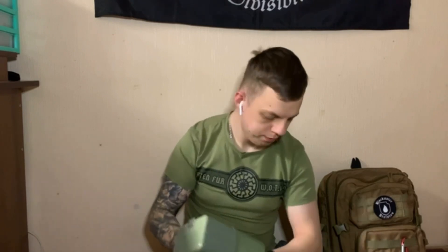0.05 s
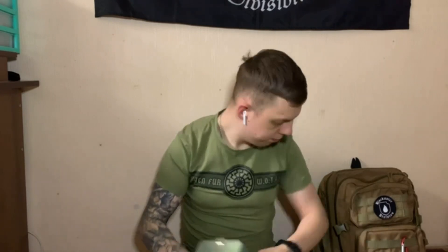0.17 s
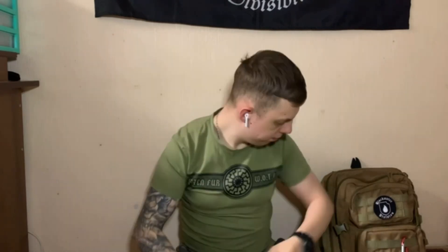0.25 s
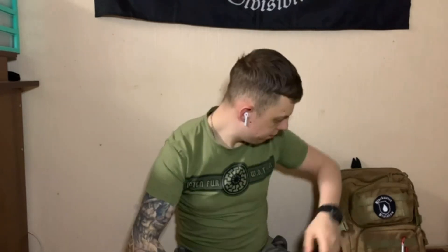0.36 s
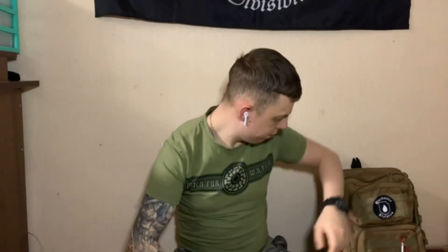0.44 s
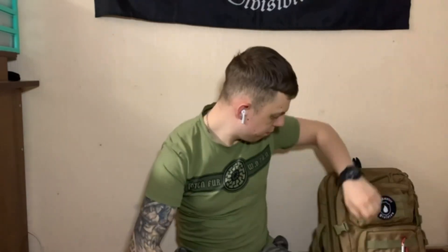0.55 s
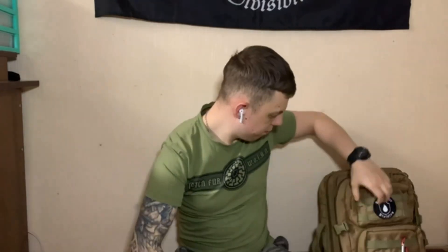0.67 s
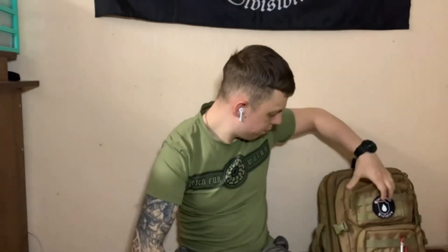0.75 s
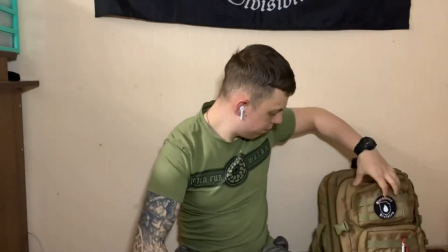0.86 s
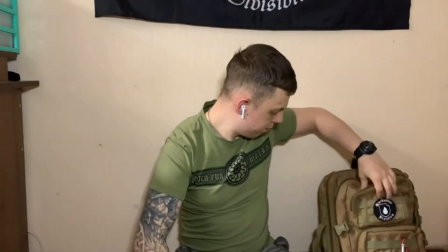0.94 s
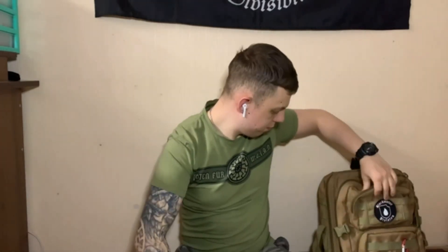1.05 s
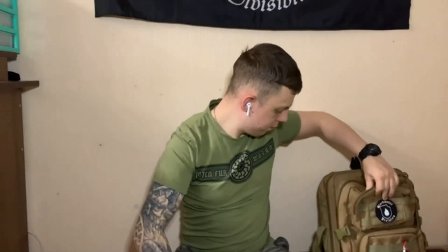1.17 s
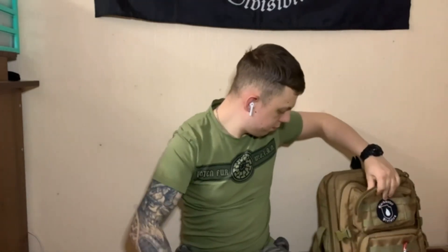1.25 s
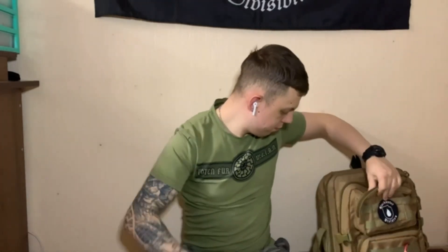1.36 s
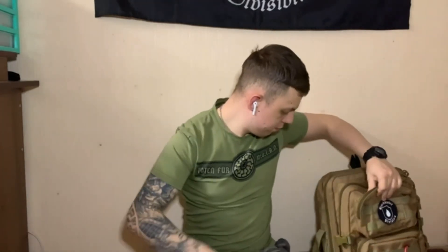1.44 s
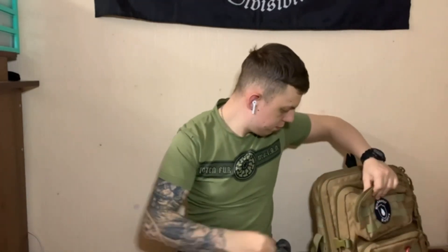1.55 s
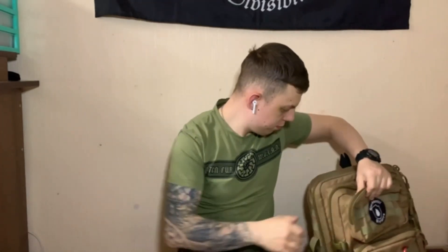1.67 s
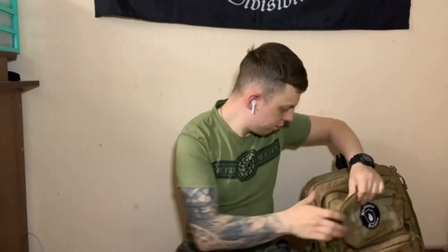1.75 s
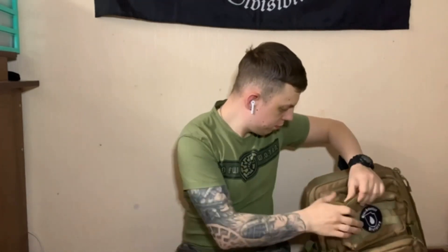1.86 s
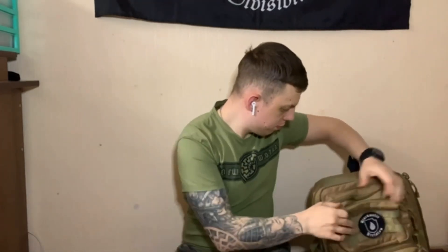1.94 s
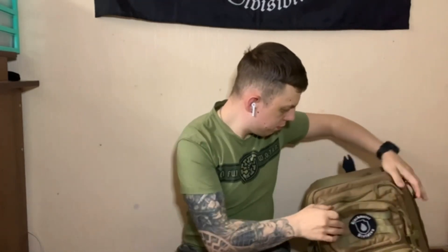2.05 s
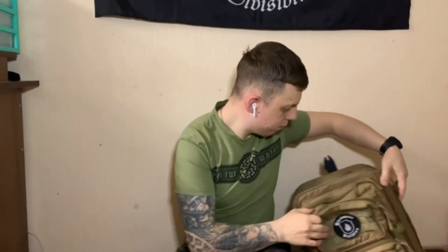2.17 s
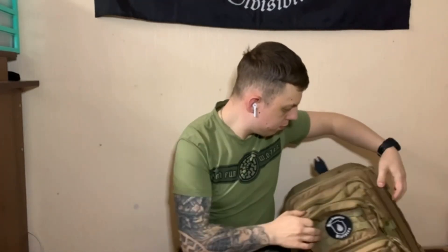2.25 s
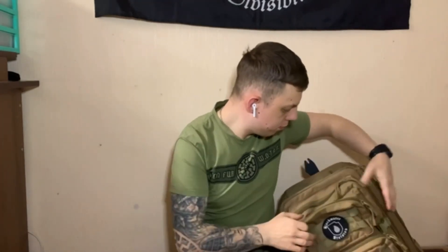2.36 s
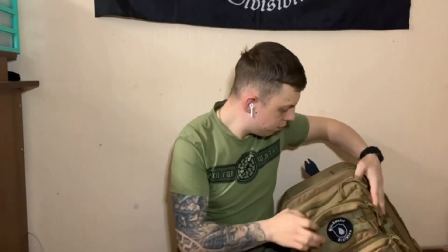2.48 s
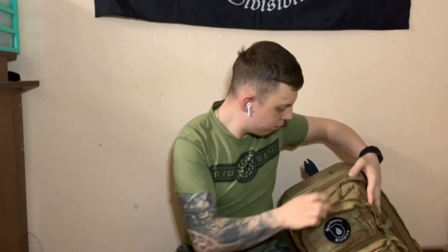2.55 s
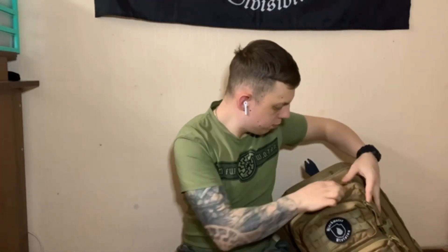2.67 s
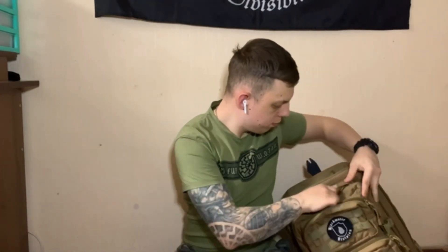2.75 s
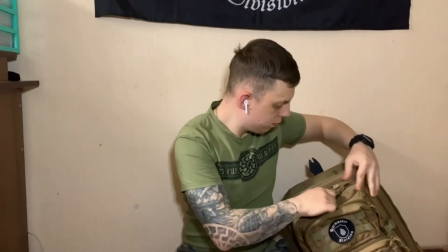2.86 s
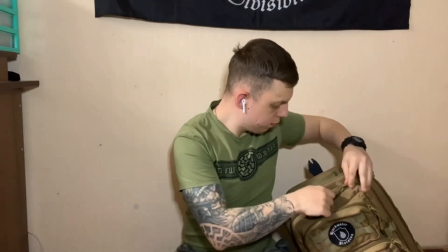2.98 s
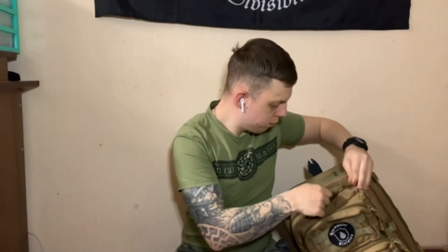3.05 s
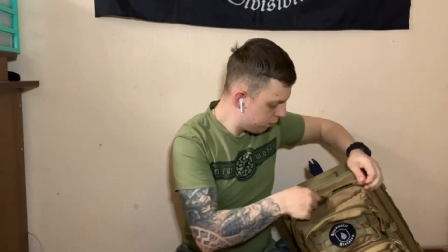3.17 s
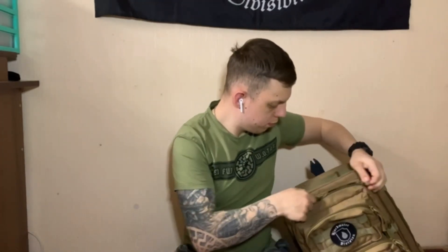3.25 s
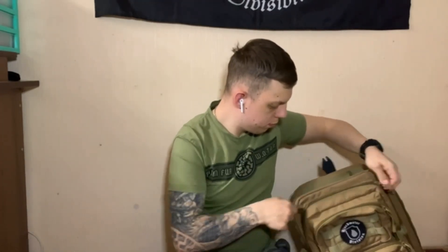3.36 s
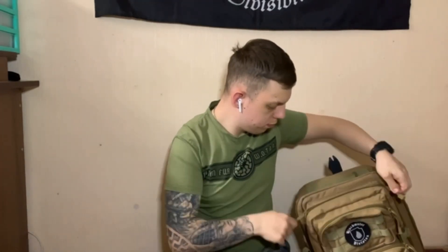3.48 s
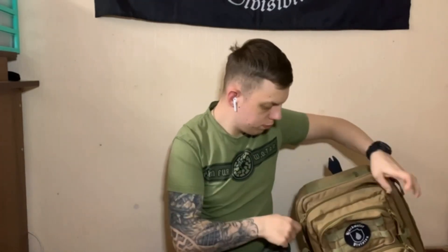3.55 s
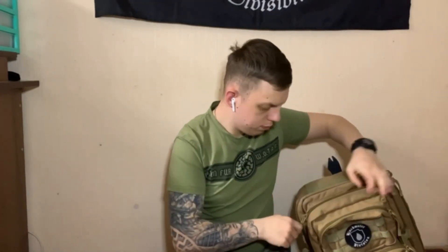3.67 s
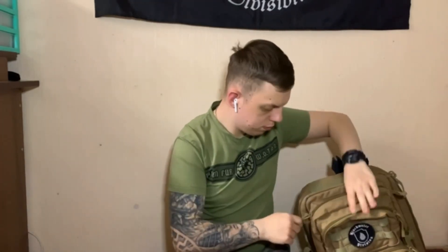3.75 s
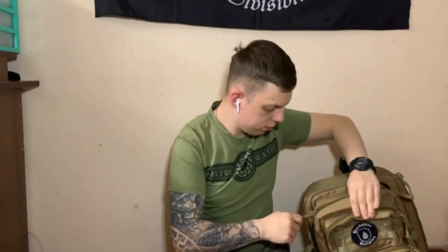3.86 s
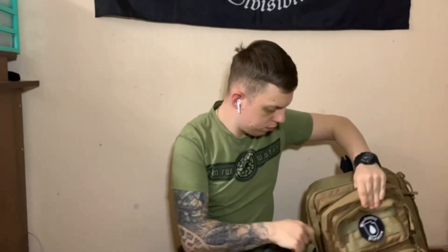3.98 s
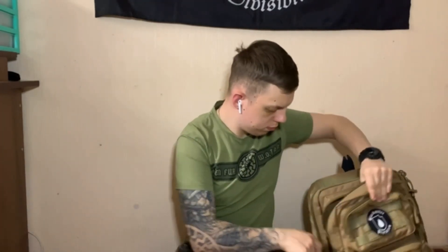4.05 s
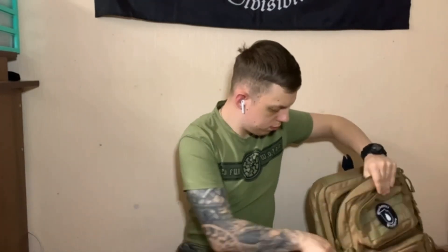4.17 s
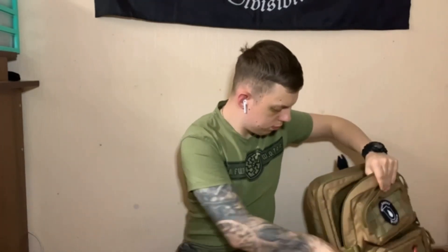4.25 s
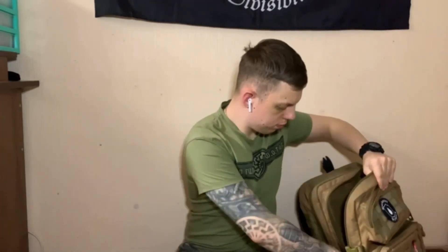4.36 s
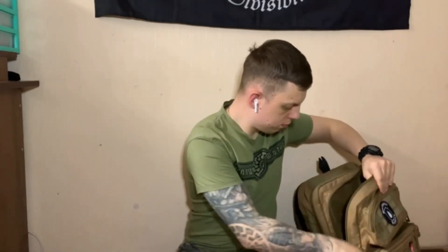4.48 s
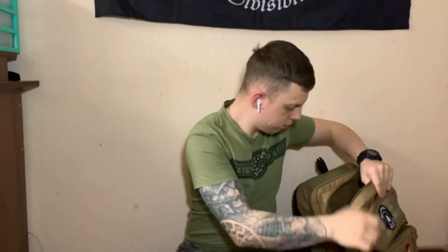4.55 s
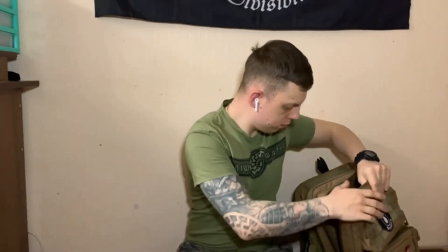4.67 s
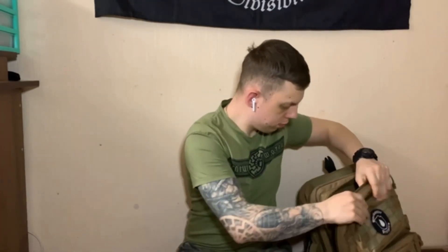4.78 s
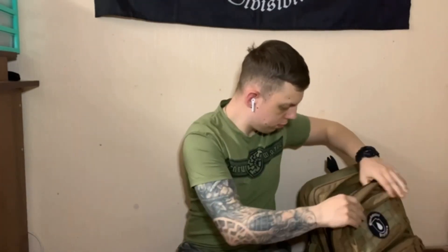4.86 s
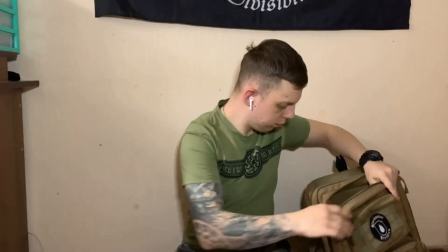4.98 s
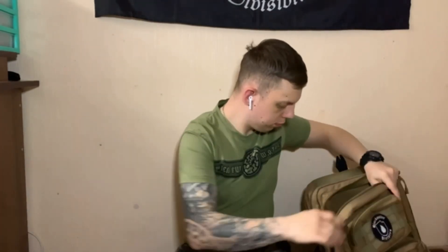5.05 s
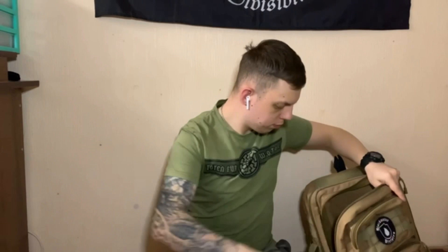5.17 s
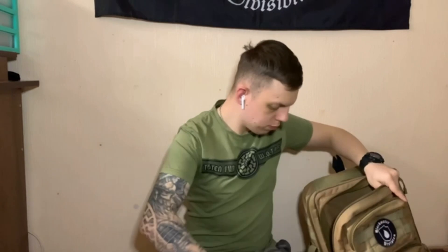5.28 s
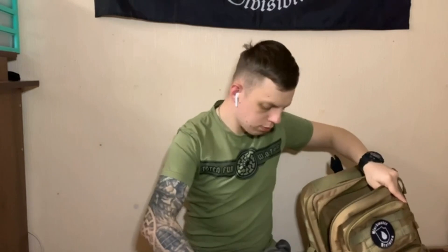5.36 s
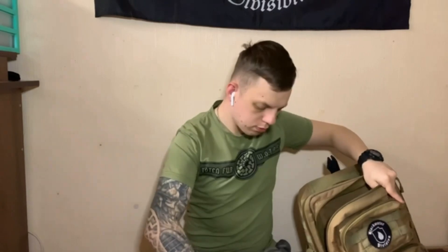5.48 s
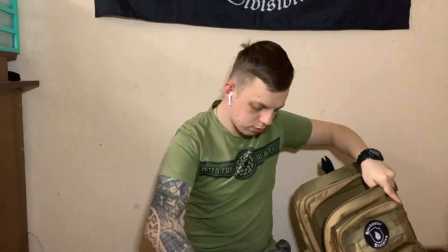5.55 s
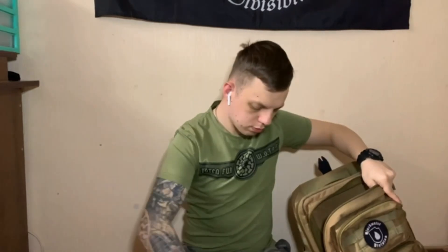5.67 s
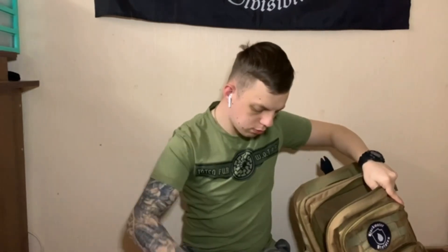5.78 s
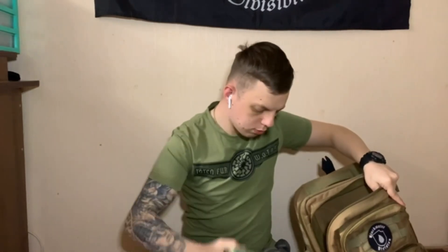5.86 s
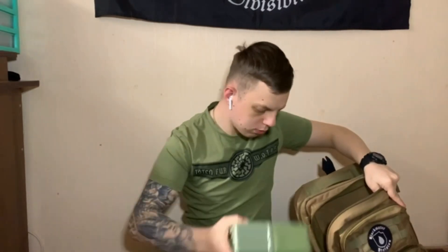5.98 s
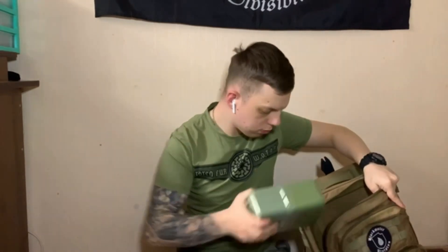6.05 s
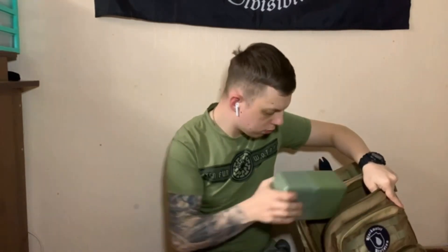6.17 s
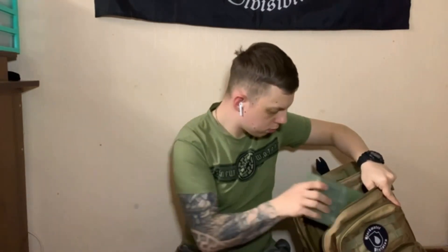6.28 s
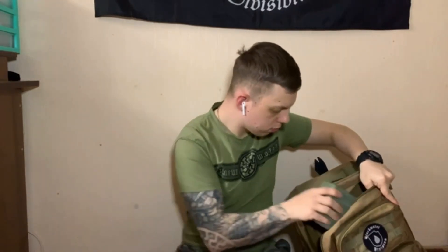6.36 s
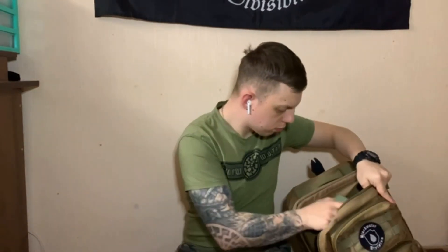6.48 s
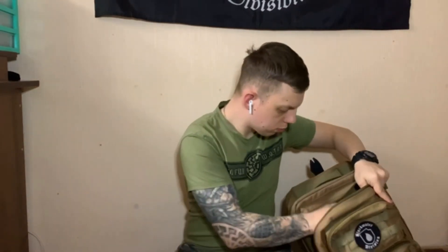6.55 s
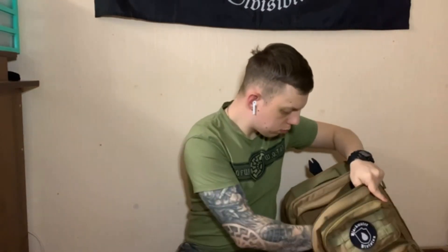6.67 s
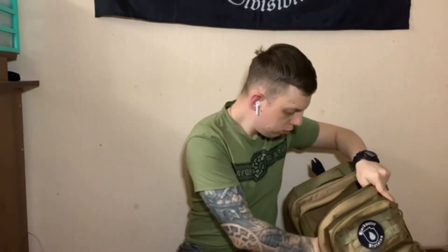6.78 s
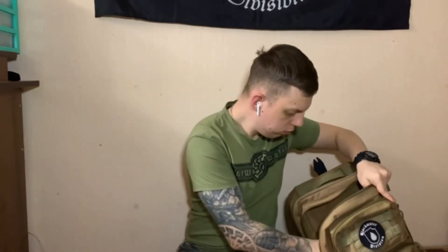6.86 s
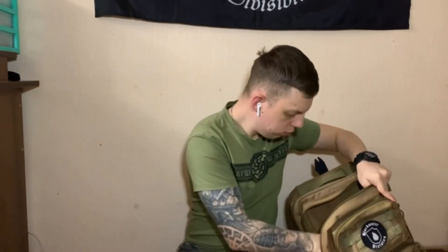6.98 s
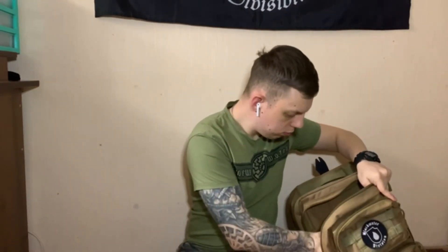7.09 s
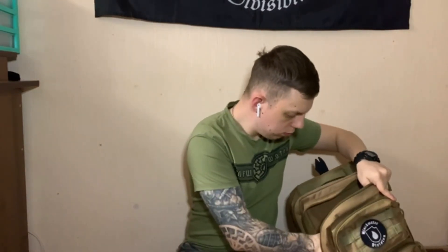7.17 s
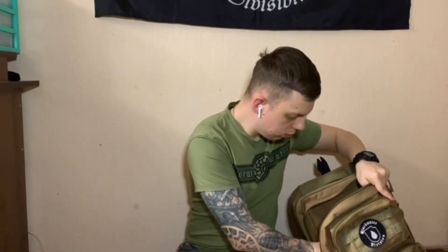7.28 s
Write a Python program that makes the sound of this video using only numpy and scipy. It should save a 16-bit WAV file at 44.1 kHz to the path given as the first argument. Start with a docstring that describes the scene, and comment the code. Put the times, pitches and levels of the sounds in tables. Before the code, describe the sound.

A backpack is handled in a small room, its stiff fabric rustling and crackling with soft bumps and faint strap squeaks. After a few sharp clicks, the zipper is pulled in two quick, buzzing strokes. More rustling and a brief lull follow, then a hard box is pushed inside with scuffs and hollow knocks, ending on a sharp clack. The microphone is close, with faint room noise behind.

```python
"""In a small room, a backpack is handled. Cloth rubs and crackles by stick-slip friction, straps squeak
under strain, and a zip slider runs twice over its teeth, driving the bag with a train of impulses.
A hard box knocks its way into the bag; each impact excites the damped modes of bag or box.
The sound reaches a close pair of microphone ports from one side, with reverberation and faint room noise."""
import sys
import numpy as np
from scipy import signal
from scipy.fft import rfft, irfft, next_fast_len
from scipy.io import wavfile
from scipy.ndimage import uniform_filter1d

SR = 44100
rng = np.random.default_rng(int(sys.argv[2]) if len(sys.argv) > 2 else 0)


def to_wav(sig):
    """Store sig (one row per channel, or 1-D mono) as 16-bit WAV at the path in sys.argv[1].

    Samples outside -1..1 are clipped; the rate is SR.
    """
    pcm = np.clip(np.atleast_2d(sig), -1, 1) * 32767
    pcm = np.round(pcm).astype(np.int16)
    wavfile.write(sys.argv[1], SR, pcm.T)  # frames by channels


N = 323025

# Spectra as heard; the notch near 11-12 kHz in several of them is not a property of the objects.
# Each row: frequency in Hz, relative level in dB.
AIR_SPECTRUM = [(30, 0.5), (50, 3), (80, -2), (150, -15), (500, -30), (1500, -37), (4500, -39.5),
                (7100, -44), (10000, -37.5), (14000, -64), (16000, -49)]  # background noise of the room
RUB_SPECTRUM = [(600, -19), (1100, -5), (1500, -1), (2000, 1.5), (2800, -4.5), (4500, -7.5), (6000, -9),
                (8000, -29)]  # slipping threads
WEAVE_SPECTRUM = [(3000, -76.5), (5000, 5), (7000, 13.5), (9000, 10), (11000, 6), (12000, -21.5),
                  (14000, 11), (16000, -25.5)]  # bright hiss of the weave
FOLD_SPECTRUM = [(150, -46), (350, 4.5), (550, 2), (900, -2.5), (1500, -9), (3000, -34.5)]  # stiff panels folding
BAG_TICK_SPECTRUM = [(3000, -41.5), (4200, 4), (7000, 16.5), (9000, 10.5), (11000, -13), (14000, -5),
                     (16000, -23)]  # sharp tick on the bag
BOX_TICK_SPECTRUM = [(3000, -45), (4200, 0), (7000, 1), (9000, 4), (11000, -3), (14000, -8), (16000, -27)]  # broad, bright tick of the box
TOOTH_SPECTRUM = [(100, -11), (195, 16.5), (300, 4.5), (470, 5.5), (620, -12), (800, -6), (1000, -4),
                  (2000, -31.5), (4000, -47.5)]  # push of a zip tooth on the bag
SLIDER_SPECTRUM = [(1500, -31), (4000, -29), (6500, 1), (8700, 3), (10500, -3.5), (12000, -25), (14000, -8),
                   (16000, -12)]  # high chatter of the slider
TAPE_SPECTRUM = [(200, -11), (600, -5), (1000, -3), (1900, -1), (3000, -8), (5500, -12.5), (9000, -11.5),
                 (12000, -23), (14000, -14), (16000, -46)]  # broad scrape of the tape
# Normal modes of the loaded bag and the hard box. Each row: frequency in Hz, level in dB, T60 in seconds.
BAG_MODES = [(108, 7, 0.054), (164.8, 1.5, 0.053), (219.5, 3.5, 0.037), (301.6, 0, 0.033), (495, 1, 0.056),
             (533, 3.5, 0.032), (595, 8, 0.037), (766, -4, 0.09), (960, -26, 0.025), (1270, 4, 0.015),
             (1324, 4.5, 0.033), (1600, -1, 0.034), (1850, 15, 0.013), (2120, 11.5, 0.009),
             (2400, 3.5, 0.012), (2778, 1, 0.12), (3960, 11, 0.011), (4200, 1, 0.013)]
BOX_MODES = [(111, -13, 0.13), (180, 4, 0.077), (267, -14, 0.025), (338, -7.5, 0.054), (557, 7.5, 0.056),
             (630, 7, 0.025), (748, 0, 0.038), (1263, 9.5, 0.05), (1384, 12, 0.049), (1470, 8, .03),
             (1540, 14, 0.046), (1860, 2, 0.034), (2000, 6, 0.038), (2300, 12, 0.015), (3110, 7, 0.034),
             (3480, 1, 0.034)]
# Grips, tugs and shoves. Each row: peak time, rise and fall in seconds, then levels in dB of
# the rub, the heave of the bag, the bright hiss of the weave and the folding of panels.
CLOTH_RUSTLES = [ (0.0, .01, 0.071, -62.5, -68, -68, -69), (0.091, 0.021, 0.06, -57, -50.5, -90, -46.5),
                 (0.363, 0.077, 0.087, -64, -60, -69, -63.5), (.63, 0.019, 0.38, -92, -60, -85, -100),
                 (0.699, 0.047, 0.36, -70.5, -61, -79, -66.5), (0.956, 0.05, 0.091, -57.5, -50, -77, -58.5),
                 (1.142, 0.37, 0.3, -68, -65.5, -71.5, -64), (1.34, 0.03, 0.35, -65.5, -87, -75.5, -74),
                 (1.41, 0.033, 0.1, -69, -51.5, -80, -55), (1.52, 0.14, 0.47, -64.5, -51.5, -77.5, -63),
                 (1.861, 0.12, 0.39, -58, -49, -61, -54.5), (2.06, 0.019, 0.21, -57, -56.5, -65.5, -76),
                 (2.148, 0.11, 0.022, -70, -42.5, -85, -50), (2.33, 0.18, 0.013, -80, -47.5, -80, -58),
                 (2.425, 0.12, 0.063, -57.5, -52, -61.5, -60), (2.508, 0.047, 0.058, -64, -53.5, -90, -56),
                 (2.674, 0.042, 0.14, -56, -48, -61, -52.5), (2.82, 0.066, 0.078, -69.5, -70, -91, -56),
                 (2.947, 0.032, 0.083, -59.5, -59, -61, -62.5), (3.05, 0.05, 0.84, -67, -49, -79, -50),
                 (3.5, 0.92, 0.094, -58, -48.5, -71, -69), (3.6, 0.072, 0.058, -61.5, -64, -69.5, -52),
                 (3.718, 0.14, 0.43, -62.5, -52.5, -79, -77), (3.81, 0.044, 0.29, -71, -50.5, -88, -79),
                 (3.9, 0.086, 0.056, -67, -50.5, -69, -62), (3.97, 0.061, 1, -63, -50, -82, -56),
                 (4.42, 0.046, 0.12, -68.5, -69, -84, -75), (4.567, 0.13, 0.021, -60.5, -53.5, -65.5, -68),
                 (4.693, 0.0082, 0.43, -63.5, -57.5, -68.5, -60),
                 (4.875, 0.045, 0.15, -57, -71, -65.5, -70), (4.94, 0.21, 0.11, -56.5, -48, -68, -58),
                 (5.031, 0.057, 0.029, -86, -55, -97, -63.5), (5.2, 0.084, 0.21, -84, -83, -76, -93),
                 (5.279, 0.063, 0.054, -69, -53, -73, -67), (5.418, 0.27, 0.17, -70, -56, -83, -63),
                 (5.649, 0.049, 0.051, -105, -66, -93, -75), (6.03, 0.32, 0.035, -95, -88, -93, -86),
                 (6.13, 0.03, 0.054, -59.5, -51, -80, -80.5), (6.178, 0.015, 0.24, -50, -58, -55.5, -75),
                 (6.3, 0.13, 0.11, -47, -46, -51, -45.5), (6.45, 0.14, 0.59, -61, -50, -71.5, -59),
                 (6.56, 0.039, 0.11, -54.5, -37.5, -57, -51), (6.7, 0.38, 0.27, -64, -80, -62.5, -83),
                 (6.826, 0.14, 0.13, -50, -40.5, -74, -44.5), (7.064, 0.092, 0.2, -59.5, -43, -58.5, -52),
                 (7.22, 0.18, 0.14, -65.5, -77, -65, -79), (7.27, 0.031, 0.12, -45, -55, -68, -49),
                 (7.32, 0.084, .1, -55, -40, -61, -60), ]
# Squeaks of strap and tape, and narrow bands where cloth rasps. Each row: peak time, rise and fall in seconds,
# frequency in Hz, # level in dB, grain length in milliseconds.
SQUEAKS_AND_RASPS = [(.068, .02, .015, 2500, -68, 4.2), (0.781, .03, 0.11, 1555, -73, 3.5),
                     (.85, 0.095, 0.088, 990, -69.5, 2.8), (.92, 0.04, 0.13, 1950, -60.5, 1.36),
                     (.98, .02, 0.052, 4540, -65, 2.2), (1.07, 0.043, .05, 2000, -63.5, 1.2),
                     (1.18, 0.24, 0.027, 1953, -63.5, 3.3), (2.29, 0.036, .04, 4370, -64.5, 0.48),
                     (2.708, 0.026, 0.043, 2400, -51, 8.1), (2.76, 0.037, 0.19, 2380, -65, 4.5),
                     (3.33, .035, 0.061, 1850, -40.5, 5), (4.025, 0.065, 0.035, 1949, -36, 1.56),
                     (5.22, 0.027, .04, 2180, -73, 2.2), (5.27, 0.071, 0.046, 5070, -67, 0.53),
                     (5.4, 0.093, 0.027, 4910, -67, 0.33), (5.97, 0.019, 0.028, 4600, -78, 0.43),
                     (6.282, 0.021, 0.017, 4170, -46, 2.4), (6.33, .06, 0.03, 3840, -64, 1.9),
                     (6.89, .05, 0.026, 797, -54, 5.6)]
# Knocks, snaps and single teeth. Each row: start in seconds, peak of the crack in dB, centre in Hz,
# width in octaves, then levels in dB relative to the crack of thud, hollow knock, rattle and tick.
IMPACTS = [ (0.085, -45.5, 1930, 0.55, -6.5, 1.5, 2.5, -20), (0.623, -71, 2130, 0.81, 22.5, -25, 2, -25),
           (0.705, -56, 2100, 2, 2, -40, -11, 4.5), (0.959, -59, 497, 0.56, 12.5, -10, -15, -40),
           (1.401, -38, 1440, 1.04, -2, -20, -42, -22), (1.437, -41, 1560, 0.92, -20, -15, -16, -20),
           (1.52, -38.5, 796, 1.3, -6, -9, -29, -22), (2.076, -35, 1560, 1.1, -19, 0.5, 0.5, -9),
           (2.145, -53, 590, 0.49, 17.5, -9, -26, -40), (2.4, -51, 1110, 0.86, -7, -10, 2, -25),
           (2.654, -55, 900, 0.94, -5, -12.5, 2, -29), (2.7, -48, 1200, 1.2, -20, -15, -2, -27),
           (2.802, -26.5, 1770, 3.1, -31, -33, -16, -17), (2.944, -36, 2540, 1.2, -10, -11.5, -27, -9.5),
           (2.965, -40, 2960, 2.5, -6, -55, -26, 0.5), (3.016, -29, 2400, 2.6, -16, -14.5, -18, -7.5),
           (3.05, -35.5, 2460, 1.7, -15, -12, -18, -11), (3.069, -37.5, 2190, 1.3, -6, -17, -5, -4),
           (3.082, -35, 2500, 1.7, -14.5, -12, -19, -3), (3.092, -35, 2500, 1.5, -15.5, -8, -16.5, -4),
           (3.1, -32, 2800, 1.5, -16, -1.5, -18, -7), (3.107, -35, 3000, 1.3, -21, -0.5, -16, -10),
           (3.765, -52.5, 496, 0.41, 13.5, -24, -27, -43), (3.827, -48, 800, 0.94, -2, -4, -22, -32),
           (3.849, -44.5, 766, 0.35, -20, -3, -17, -35), (3.866, -31, 2320, 2.9, -19, -28, -15, -8.5),
           (3.923, -29.5, 2600, 2.6, -36, -23, -14, -9.5), (3.959, -31.5, 2400, 1.2, -29, -17, -21, -3),
           (3.998, -36, 805, .6, -9, 0, -1, -30), (4.672, -49.5, 1790, 2, 5, -15, -4.5, -13),
           (4.715, -43.5, 1600, 1.25, -6, -9.5, -39, -22), (5.25, -42.5, 686, 0.33, -33, -8.5, -31, -32),
           (6.104, -52, 4000, 1.5, -19, -24, -11, -2), (6.118, -50, 595, 0.29, -27, 4, -22, -40),
           (6.216, -37, 2400, 0.75, -37, -32, -23, -9), (6.2743, -22.5, 2890, 1.8, -45, -22, -18, -6.5),
           (6.551, -46, 1950, 1, -1, 15, 4.5, -15), (6.63, -41.5, 302, 1.4, 3, -16, -35, -50),
           (6.705, -47, 910, 0.91, -1, -4, -17, -31), (6.769, -40.5, 1500, 1.4, -16, -3.5, -8, -4),
           (6.727, -50, 1720, 0.66, 2, -15, -4, -25), (6.811, -27, 1730, 1.13, -5.5, -4, 3.5, -14),
           (7.231, -42, 810, 0.71, -18, -4.5, -22, -33), (7.2527, -29.5, 1520, 1.3, -30, -8, -0.5, -7),
           (7.256, -12.5, 1984, 0.4, -17, -13.5, -28, -12), (7.2579, -24, 3280, 0.57, -30, -31, -14, -4),
           (7.264, -31.5, 1980, 0.87, 0, -2, -3, -18), ]
# Speed of the slider. Each row: time in seconds, rate in teeth per second.
SLIDER_SPEED = [(3.051, 52), (3.075, 70), (3.087, 108), (3.105, 128), (3.122, 156), (3.15, 156),
                (3.168, 200), (3.21, 205), (3.218, 298), (3.25, 310), (3.29, 345), (3.33, 350),
                (3.355, 290), (3.4, 170), (3.53, 50), (3.94, 140), (3.97, 240), (4.0, 280), (4.035, 305),
                (4.07, 255), (4.1, 140), (4.135, 140), (4.17, 290), (4.182, 490), (4.2, 450), (4.222, 355),
                (4.25, 262), (4.33, 290), (4.39, 80)]
# One table per zip stroke. Each row: time in seconds, then levels in dB of buzz, scrape and tick.
ZIP_STROKES = [
    [(3.051, -47, -54.5, -66), (3.059, -50.5, -66.5, -64), (3.1, -56.5, -52, -55), (3.115, -40.5, -40, -55),
     (3.155, -39.5, -41.5, -61), (3.185, -41.5, -39, -49.5), (3.213, -41, -42, -42.5),
     (3.235, -32.5, -42, -40.5), (3.267, -34.5, -43, -39), (3.301, -42.5, -42.5, -45.5),
     (3.343, -35, -41.5, -40.5), (3.417, -56, -47, -52.5), (3.451, -48, -41, -49), (3.485, -65, -56, -70),
     (3.53, -72, -85.5, -88)],
    [(3.94, -54, -66.5, -72), (3.97, -57.5, -38.5, -49.5), (4.002, -46, -40, -41.5),
     (4.02, -53, -43.5, -39.5), (4.05, -40, -44, -55), (4.09, -49, -39.5, -46), (4.13, -54.5, -41, -45.5),
     (4.17, -41.5, -40, -44), (4.2, -33.5, -49, -49), (4.228, -39, -42.5, -51), (4.268, -47.5, -40, -71),
     (4.284, -37.5, -46.5, -87), (4.342, -72, -54, -103), (4.39, -69, -91, -91)],
]
# Reverberation of the room. Each row: frequency in Hz, T60 in seconds, level in dB.
ROOM_DECAY = [(106, 0.24, -3), (404, 0.3, 0), (1200, 0.3, 0), (2100, 0.28, -3.5), (4300, 0.2, 1.5),
              (10800, 0.16, -4)]
# Diffuse sound at the two ports. Each row: frequency in Hz, left-right coherence from 0 to 1.
COHERENCE = [(25, 1), (60, 1), (150, 0.58), (300, 0.41), (650, 0.004), (1400, 0), (16000, 0)]
# Direct sound at the left port. Each row: frequency in Hz, phase relative to the right in radians.
LEFT_PHASE = [(100, 0), (600, -.35), (1800, -1.0), (2400, -.3), (4250, -.4), (5400, -2.1), (7500, -3.6),
              (8600, -6), (10200, -6.6), (10900, -9.3), (12300, -9.5), (13200, -12.6), (15000, -12.6),
              (16000, -15.7)]

AIR_DB, SWING_DB = -63, 20  # level of the room noise; depth of a swell over its rise or fall time
RATTLE_T60_S, PUSH_S = 0.065, 0.0033  # decay of a rattle; length of the soft push behind a thud
SPOT_SHIFT = .012  # each blow lands on another spot and shifts the modes by about this fraction
BOX_DOWN_S, BOX_LIFTED_S = .3, 6.0  # blows ring the bag between these times, otherwise the box
MIC_LOW_HZ, MIC_HIGH_HZ = 42.3, 15900


def gain_of(db):
    """Amplitude ratio of a level in decibels."""
    return 10 ** (np.asarray(db) / 20)


def unit_rms(x):
    """Normalisation to a root-mean-square value of 1."""
    return x / np.sqrt(np.mean(x ** 2) + 1e-20)


def wander(samples, shape=N):
    """A moving average turns white noise into a slow fluctuation of unit rms."""
    return unit_rms(uniform_filter1d(rng.standard_normal(shape), samples))


def at_hz(table, hz, column=1):
    """Interpolation of one column on a logarithmic frequency axis."""
    table = np.asarray(table)
    return np.interp(np.log(hz + 1), np.log(table[:, 0] + 1), table[:, column])


def swell(peak_s, rise_s, fall_s):
    """Exponential growth to a gain of 1, followed by exponential decay."""
    t = np.arange(N) / SR - peak_s
    return gain_of(-SWING_DB * np.maximum(-t / max(rise_s, .005), t / max(fall_s, .005)))


def coloured(x, spectrum):
    """Minimum-phase filtering: the phase follows from the Hilbert transform of the log gain."""
    log_gain = np.log(gain_of(at_hz(spectrum, abs(np.fft.fftfreq(8192, 1 / SR)))))
    taps = np.fft.ifft(np.exp(np.conj(signal.hilbert(log_gain)))).real[:2048]
    return signal.oaconvolve(x, taps)[:len(x)]


def resonate(force, weight_db, modes=BAG_MODES):
    """Modal superposition: a force is convolved with a sum of damped sinusoids."""
    hz, db, t60 = np.transpose(modes)[:, :, None]
    t = np.arange(6000) / SR
    partials = gain_of(db + weight_db(hz) - 60 * t / t60) * np.sin(2 * np.pi * hz * t)
    radiation = signal.butter(2, 110, "highpass", fs=SR)  # a small body radiates little bass
    return signal.oaconvolve(force, signal.lfilter(*radiation, partials.sum(0)))[:len(force)]


def diffuse_pair(left, independent, hz):
    """A diffuse field is coherent at two nearby points only at long wavelengths."""
    coherence = np.clip(at_hz(COHERENCE, hz), -1, 1)
    return np.array([left, coherence * left + np.sqrt(1 - coherence ** 2) * independent])


def room_air():
    """Diffuse background noise: the rumble of the house and a faint hiss, slowly wavering."""
    hz = np.fft.rfftfreq(N, 1 / SR)
    white = diffuse_pair(*rfft(rng.standard_normal((2, N))), hz)
    air = irfft(white * gain_of(at_hz(AIR_SPECTRUM, hz)), N)
    return gain_of(AIR_DB + 1.06 * wander(4000)) * unit_rms(air)


def through_room(x):
    """Direct sound reaches the left port late; wall reflections add a tail that decays by band."""
    reflections = np.zeros((2, SR // 2))
    slots = np.arange(330, SR // 2 - 20, 20)
    arrivals = slots + rng.integers(0, 20, (2, len(slots)))
    np.put_along_axis(reflections, arrivals, rng.choice([-1., 1.], arrivals.shape), 1)
    band_hz, t, bands = signal.stft(reflections, SR, nperseg=256)
    t60 = at_hz(ROOM_DECAY, band_hz)[:, None]
    energy = t60 / (2 * np.log(1000)) * SR / 20
    bands *= gain_of(at_hz(ROOM_DECAY, band_hz, column=2)[:, None] - 60 * t / t60) / np.sqrt(energy)
    size = next_fast_len(N + SR)
    hz = np.fft.rfftfreq(size, 1 / SR)
    tail = diffuse_pair(*rfft(signal.istft(bands, SR, nperseg=256)[1], size), hz)
    direct = np.array([np.exp(1j * at_hz(LEFT_PHASE, hz)), np.ones(len(hz))]) * gain_of([[-.3], [.2]])
    return irfft(rfft(x, size) * (direct + tail), size)[:, :N]


def slips(per_s, spread_db):
    """Stick-slip friction as a Poisson process: impulses of random sign, a few of them large."""
    chance, size, sign = rng.random(N), rng.exponential(1, N), rng.standard_normal(N)
    return unit_rms((chance < per_s / SR) * gain_of(spread_db * np.minimum(size, 5)) * sign)


def creased(force, spectrum, depth_db):
    """Transient resonance: creases in the nylon come and go, each briefly colouring a narrow band."""
    bands = signal.stft(coloured(force, spectrum), nperseg=1024)[2]
    patches = uniform_filter1d(rng.standard_normal(bands.shape), size=3, axis=0)
    patches = unit_rms(uniform_filter1d(patches, size=3, axis=1))
    return unit_rms(signal.istft(bands * gain_of(depth_db * patches), nperseg=1024)[1][:len(force)])


def bumps():
    """Soft contacts inside the bag excite its seven lowest modes independently."""
    def rolloff_db(hz):
        return -11.0 * np.maximum(np.log2(hz / 210), 0) ** 2.7

    strengths = gain_of(4.0 * np.clip(wander(2200, (7, N)), -2, 1.2))
    return sum(resonate(strength * slips(per_s=400, spread_db=1.2), rolloff_db, [mode])
               for strength, mode in zip(strengths, BAG_MODES))


def cloth():
    """Friction makes threads slip and crackle while the bag heaves; overlapping rustles add in power."""
    power = sum(np.outer(gain_of(row[3:]), swell(*row[:3])) ** 2 for row in CLOTH_RUSTLES)
    rub, heave, hiss, fold = np.sqrt(power)
    clusters = gain_of(2.63 * wander(600, (3, N)) + 2.0 * wander(3500, (3, N)))  # cloth yields in bursts
    crackle = slips(per_s=2200, spread_db=2.0)
    weave_force = clusters[0] * (crackle + 2.1 * rng.standard_normal(N))
    weave = hiss * creased(weave_force, WEAVE_SPECTRUM, depth_db=2.0)
    thread_force = clusters[1] * (crackle + 1.7 * rng.standard_normal(N))
    threads = rub * creased(thread_force, RUB_SPECTRUM, depth_db=3.5)
    panel_force = clusters[2] * (slips(per_s=1500, spread_db=-0.5) + 0.29 * crackle)
    panels = fold * creased(panel_force, FOLD_SPECTRUM, depth_db=3.0)
    return threads + weave + panels + heave * unit_rms(bumps())


def squeak(peak_s, rise_s, fall_s, hz, db, grain_ms):
    """Random amplitude modulation widens a tone of strained strap or rubbing cloth into a band; short grains
    rasp."""
    waver = wander(round(grain_ms * SR / 1000))
    drift = 1 + .006 * wander(1500)  # the pitch wanders with the strain
    tone = np.sqrt(2) * np.sin(2 * np.pi * hz * np.cumsum(drift) / SR)
    return gain_of(db) * swell(peak_s, rise_s, fall_s) * waver * tone


def knocks():
    """Impact excitation: an impulse and a dying rattle set the bag or the box ringing in its modes."""
    length = 9000
    out, t = np.zeros(N + length), np.arange(length) / SR
    impulse = 1. * (t == 0)
    for row, noise in zip(IMPACTS, rng.standard_normal((len(IMPACTS), length))):
        start_s, db, hz, octaves, thud_db, hollow_db, rattle_db, tick_db = row
        on_box = not BOX_DOWN_S < start_s < BOX_LIFTED_S
        modes = np.array(BOX_MODES if on_box else BAG_MODES)
        modes[:, 0] *= 1 + SPOT_SHIFT * noise[-len(modes):]
        band = [(hz * 2 ** (widths * octaves), level_db) for widths, level_db in
                [(-2, -30), (-.5, -5), (0, 0), (.5, -5), (1.43, -30), (1.6, -60)]]
        rattle = noise ** 3 / 4 * gain_of(-60 * t / RATTLE_T60_S) * (1 - np.exp(-t / 0.00084))
        force = impulse + 0.15 * rattle
        soft_push = np.convolve(force, np.hanning(round(PUSH_S * SR)))[:length]
        ring = resonate(force, lambda f: at_hz(band, f) - 40 * (f < 350), modes)
        thud = resonate(soft_push, lambda f: -40 * (f >= 350), modes)
        hollow = resonate(force, lambda f: -40 * ((f < 350) | (f > 900)), modes)
        burst = impulse + 0.75 * noise * gain_of(-60 * t / 0.017)
        tick = coloured(burst, BOX_TICK_SPECTRUM if on_box else BAG_TICK_SPECTRUM)
        crack = coloured(impulse, band)
        parts = ((crack, 0), (ring, rattle_db + 2), (coloured(rattle, band), rattle_db - 7),
                 (thud, thud_db), (hollow, hollow_db), (tick, tick_db))
        at = round(start_s * SR)
        for part, part_db in parts:
            out[at:at + length] += gain_of(db + part_db) * part / abs(part).max()
    return out[:N]


def zip_stroke(rows):
    """Impulse-train excitation: each parting tooth pushes the bag and ticks the slider; the tape scrapes."""
    times, *levels = np.transpose(rows)
    t = np.arange(times[0], times[-1], 1 / SR)
    rate = np.interp(t, *np.transpose(SLIDER_SPEED))
    buzz_db, scrape_db, tick_db = (np.interp(t, times, level) for level in levels)
    teeth_passed = np.cumsum(rate * (1 + .03 * wander(150, len(t)))) / SR
    push_scatter, tooth_scatter, grit = rng.standard_normal((3, len(t)))
    clicks = np.diff(np.floor(teeth_passed), prepend=0) / np.sqrt(rate)

    push = -clicks * gain_of(1.2 * push_scatter)
    ring = unit_rms(resonate(push, lambda hz: -14 * abs(np.log2(hz / 500))))
    hollowness = 0.55 * np.minimum(200 / rate, 1.6) ** 0.75  # slow teeth ring hollow
    buzz = unit_rms(unit_rms(coloured(push, TOOTH_SPECTRUM)) + hollowness * ring)

    since_tooth_s = (teeth_passed % 1) / rate
    strength = gain_of(np.minimum(rate / 80, 2.2) * tooth_scatter[teeth_passed.astype(int)])
    chatter = np.exp(-since_tooth_s / .0007) * grit[::-1] / np.sqrt(rate)  # the loose slider rattles
    tick = unit_rms(coloured(strength * chatter, SLIDER_SPECTRUM))

    jolt = strength * np.exp(-since_tooth_s / .001)
    friction = (rate / 400 + 0.67 * jolt) * grit
    snaps = 30 * (1 + (110 / rate) ** 2) * strength * clicks
    scrape = unit_rms(coloured(friction + snaps, TAPE_SPECTRUM))

    out, at = np.zeros(N), round(times[0] * SR)
    out[at:at + len(t)] = gain_of(buzz_db) * buzz + gain_of(tick_db) * tick + gain_of(scrape_db) * scrape
    return out


def scene():
    """Superposition: the sources at the bag share one path through the room, over its background noise."""
    squeaks = sum(squeak(*row) for row in SQUEAKS_AND_RASPS)
    rustles = cloth()
    zipper = sum(zip_stroke(rows) for rows in ZIP_STROKES)
    return through_room(rustles + squeaks + zipper + knocks()) + room_air()


def record(dry):
    """Band limiting: the microphones lose the lowest bass and the highest treble."""
    highpass = signal.butter(4, MIC_LOW_HZ, "highpass", fs=SR, output="sos")
    lowpass = signal.firwin(511, MIC_HIGH_HZ, window=("kaiser", 9), fs=SR)
    return signal.oaconvolve(signal.sosfilt(highpass, dry), lowpass[None], "same")


dry = scene()
out = record(dry)
to_wav(out)
```